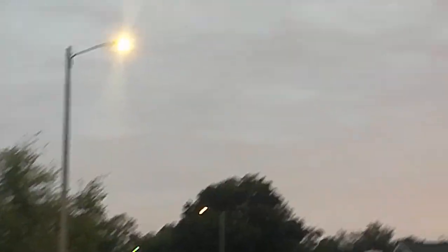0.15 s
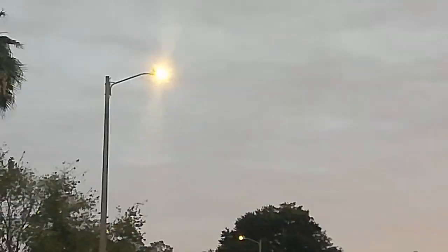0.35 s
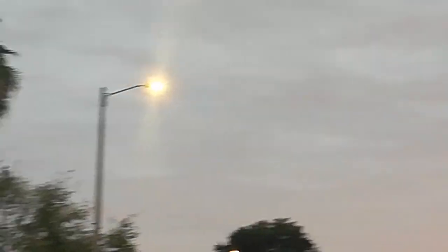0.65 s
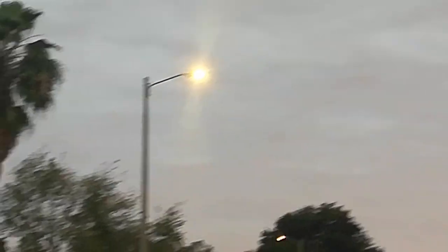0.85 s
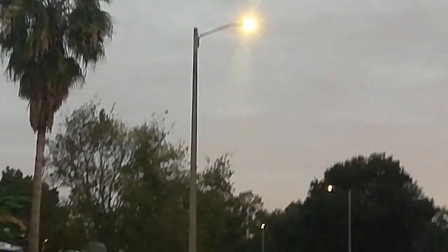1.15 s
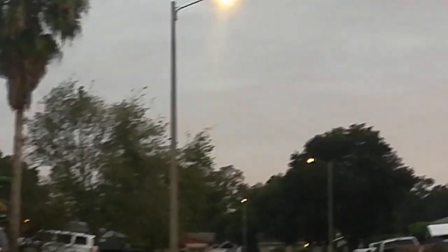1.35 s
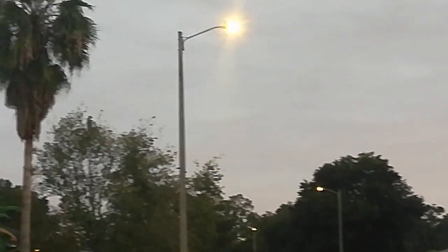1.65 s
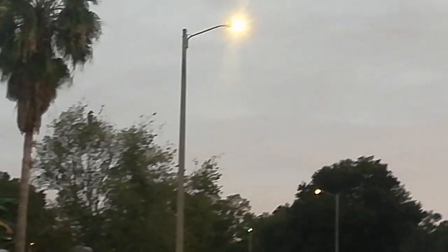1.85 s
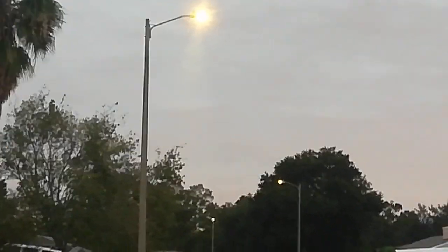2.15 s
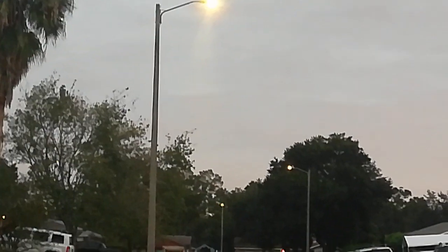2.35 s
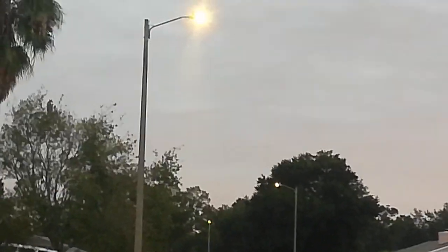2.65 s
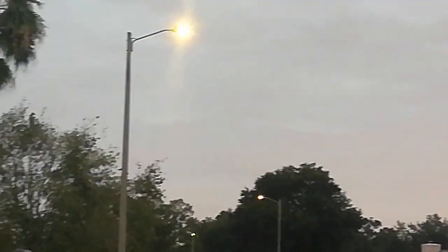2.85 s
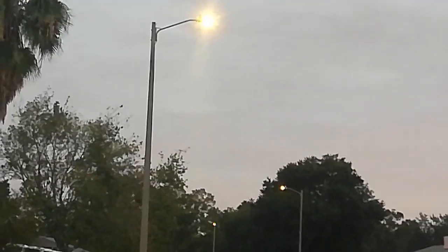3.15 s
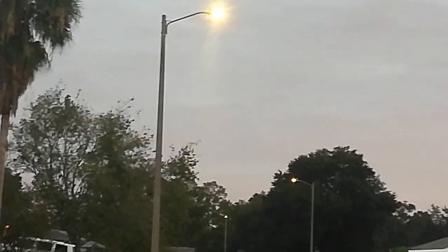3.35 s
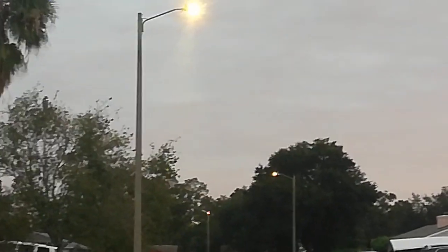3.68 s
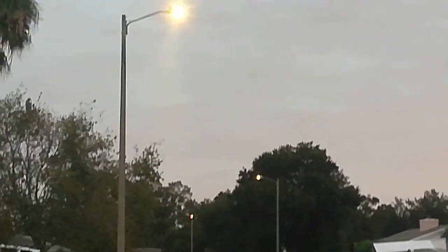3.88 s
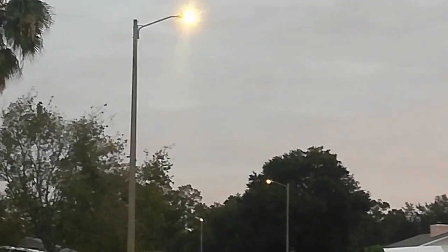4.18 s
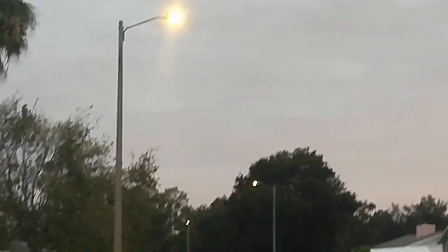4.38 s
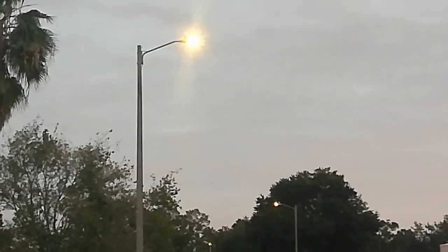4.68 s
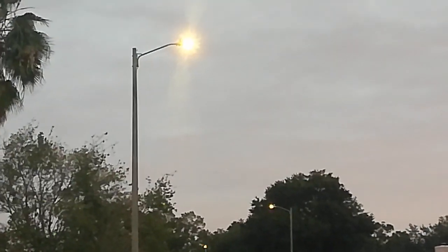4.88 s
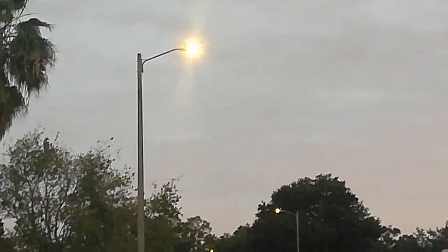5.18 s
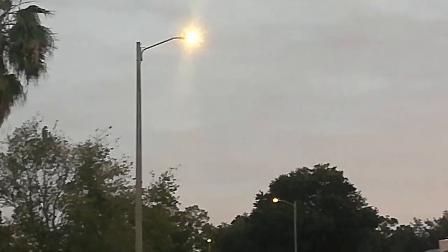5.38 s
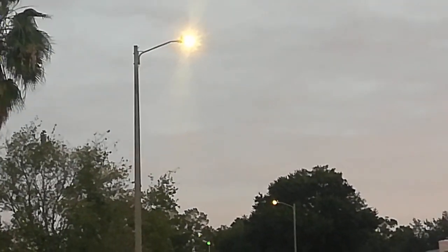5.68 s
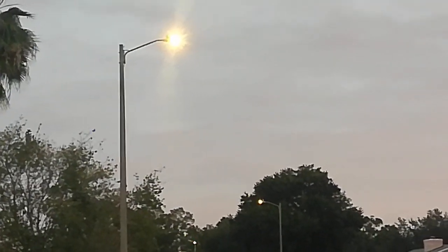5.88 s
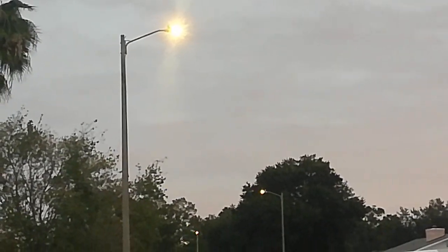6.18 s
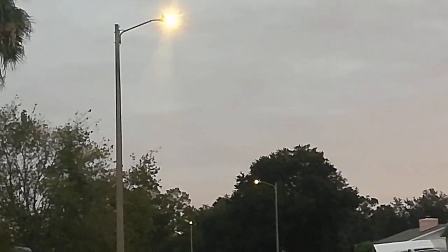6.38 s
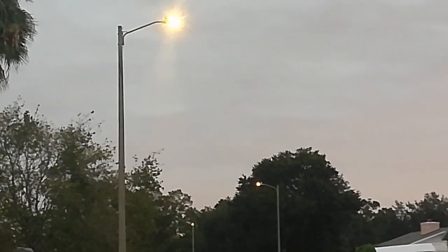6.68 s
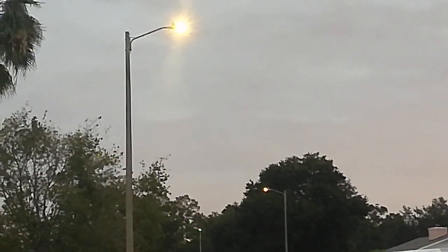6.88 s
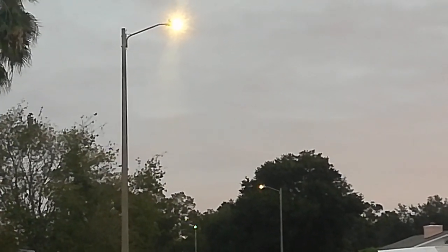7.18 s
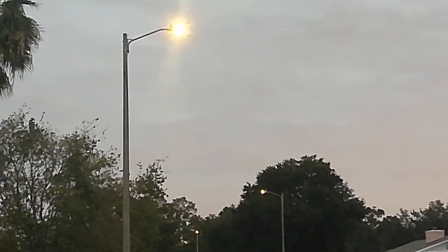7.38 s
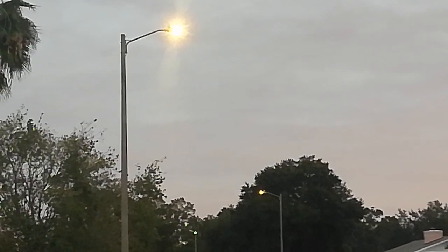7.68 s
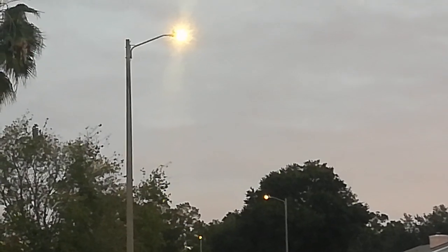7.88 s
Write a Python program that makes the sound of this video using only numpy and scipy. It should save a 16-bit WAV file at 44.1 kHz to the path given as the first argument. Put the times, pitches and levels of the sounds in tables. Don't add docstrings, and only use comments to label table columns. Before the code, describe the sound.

A handheld stereo microphone picks up a quiet street with trees at dawn, with faint distant traffic and light hiss throughout. Jays are already scolding at 0 s: hoarse, nasal, bright cries, each about 0.3 to 0.5 s, sliding downward and growing rougher, with a short diffuse echo. A tiny housing creak ticks at 0.4 s and a low thump at 1 s. Cries follow closely until about 2.9 s, then nearly stop, leaving faint low notes near 3.4 s. Wind rumbles strongest around 3.7 and 4.4 s. Calls resume at 4 s, with a rising pipe at 4.6 s and overlapping falls around 5 to 5.7 s. Dull finger bumps land near 4.5, 5.3 and 6.1 s. A thin, wavering far wail on the right is clearest from 5.9 to 6.5 s, ending in a clean whistle. From 6.5 s jays crowd together, with a short chirp at 7.7 s and cries continuing to the cut at 8 s.

```python
import sys
import numpy as np
from scipy import signal
from scipy.fft import rfft, irfft, next_fast_len
from scipy.io import wavfile
from scipy.ndimage import uniform_filter1d

SR = 44100
rng = np.random.default_rng(int(sys.argv[2]) if len(sys.argv) > 2 else 0)


def put_to_file(sound):
    columns = np.atleast_2d(sound).T
    safe = np.clip(columns, -1, 1)
    whole_steps = np.round(safe * 32767)
    wavfile.write(sys.argv[1], SR, whole_steps.astype(np.int16))


def attenuation_scalar(level_db):
    decades = np.asarray(level_db, float) / 20
    return 10 ** decades


N = 354556


def evened(x):
    return x / np.sqrt(np.mean(x ** 2) + 1e-20)


def read(points, hz):
    f, value = np.transpose(points)
    return np.interp(np.log(hz + 1), np.log(f + 1), value)


def colour(x, db_at):
    n = next_fast_len(x.shape[-1], real=True)
    gain = attenuation_scalar(db_at(np.fft.rfftfreq(n, 1 / SR)))
    return irfft(rfft(x, n) * gain, n)[..., :x.shape[-1]]


def add(mix, s, sound):
    at = round(s * SR)
    part = mix[max(at, 0):][:len(sound) + min(at, 0)]
    part += sound[max(-at, 0):][:len(part)]


def wobble(n, hz, count=1):
    slow = rng.standard_normal((count, (n // SR + 1) * SR // 16 + 300))
    slow = signal.lfilter(*signal.butter(N=2, Wn=hz, fs=SR / 16), slow)
    slow = evened(slow[:, 298:])
    place = np.arange(n) / 16
    low = place.astype(int)
    return np.squeeze(slow[:, low] + (place - low) * (slow[:, low + 1] - slow[:, low]))


def edges(t, rise, fall):
    return np.clip((t - t[0]) / rise, 0, 1) * np.clip((t[-1] - t) / fall, 0, 1)


# overtone, group (0 beak, 1 nasal, 2 bright), level_db within its group
OVERTONES = [(2, 0, -27.5), (3, 0, -21), (4, 0, 0), (5, 1, 0), (6, 1, 2.5), (7, 2, -5), (8, 2, 6),
             (9, 2, -2), (10, 2, -4), (11, 2, -16), (12, 2, -23)]
# freq_hz, density_db_per_hz
RASP_SPECTRUM = [(880, -53), (1500, -22), (2100, -15.5), (2440, -12.5), (2900, -4), (4200, -3), (4940, -11),
                 (5710, -9.5), (6370, -13), (6910, -9.5), (8270, -19.5), (8810, -15.5), (10000, -34),
                 (13000, -36)]


def cry(start, length, top_hz, last_hz, effort_db, nasal_db, bright_db, rasp_db, sag_db, scoop_s):
    t = np.arange(0, length, 1 / SR)
    strain = np.minimum(t / 0.28, 1.2)

    glide_hz = last_hz + (top_hz - last_hz) * (1 - t / length) ** 1.8
    hz = glide_hz * (1 - .2 * np.exp(-t / scoop_s))

    level_db = effort_db - 10 * np.exp(-t / (2.2 * scoop_s)) + sag_db * (t / length) ** 2
    beak_hz, beak_width_hz = 3350, 200
    main_db = level_db - np.minimum(((4 * hz - beak_hz) / beak_width_hz) ** 2, 8.)
    nasal_db = level_db + nasal_db + .6 * strain
    bright_db = nasal_db + bright_db - 5 * (strain - .4)
    rasp_db = level_db + rasp_db + 7 * (strain - 1)
    group_db = np.array([main_db, nasal_db, bright_db])

    jitter = 0.0054 * (0.24 + strain) * wobble(len(t), hz=150)
    turns = np.cumsum(hz * (1 + jitter)) / SR
    flutter_hz = 110 + 35 * wobble(len(t), hz=25.45)
    flutter = 1 + 0.23 * (0.3 + strain) * np.sin(2 * np.pi * np.cumsum(flutter_hz) / SR)

    k, group, db = np.transpose(OVERTONES)[:, :, None]
    waves = np.cos(2 * np.pi * (k * turns + rng.random(k.shape)))
    odd_db = -5.0 * (k % 2) * (1 - strain)
    drift_db = 2.9 * wobble(len(t), hz=28.7, count=len(k))
    nose_hz, nose_width_hz = 4250, 380
    db = db + 8 * np.exp(-((k * hz - nose_hz) / nose_width_hz) ** 2)
    overtone_db = group_db[group[:, 0].astype(int)] + db + odd_db + drift_db
    tone = np.sum(attenuation_scalar(overtone_db) * waves, axis=0)

    uneven = wobble(len(t), hz=202, count=len(k))
    blurred = np.sum(uneven * attenuation_scalar(-4.0 * (k % 2)) * waves, axis=0)
    airy = evened(blurred) + rng.standard_normal(SR)[:len(t)]
    rasp = attenuation_scalar(rasp_db) * evened(colour(airy, lambda f: read(RASP_SPECTRUM, f)))
    return (np.sqrt(2) * tone + rasp) * flutter * edges(t, rise=0.0054, fall=0.011)


# start_s, length_s, top_pitch_hz, last_pitch_hz, effort_db
NASAL_JAY = [
    (-.1, .4, 850, 700, -45),
    (1.15, .38, 850, 690, -39.5),
    (2.478, 0.38, 865, 665, -41.5),
    (4.31, 0.5, 881, 704.6, -42),
    (5.16, .33, 823, 702, -41.5),
    (5.29, .48, 825, 705, -39.5),
]
HOARSE_JAY = [
    (-.2, .3, 930, 800, -36),
    (1.445, 0.37, 905, 785, -35.5),
    (1.77, 0.36, 819, 706.5, -40),
    (6.595, .17, 885, 745, -41),
    (6.97, 0.5, 885, 700.3, -38),
    (7.07, 0.34, 923, 759.4, -38),
    (7.445, 0.25, 871, 775, -36),
]
FADING_JAY = [
    (0.6, 0.5, 870, 725, -37),
    (2.1, 0.4, 861, 705, -37.5),
    (4.89, 0.42, 875, 715, -35),
    (6.87, 0.32, 952, 769, -36.5),
    (7.78, .26, 956, 827, -37),
]
CLEAR_JAY = [
    (0.435, 0.4, 905, 699.4, -38),
    (3.87, .13, 730, 720, -67),
    (4.035, 0.44, 845, 721.4, -42),
    (6.51, .13, 910, 840, -45),
    (6.745, .375, 895, 735, -37.5),
]
PIPING_JAY = [
    (4.58, .3, 885, 940, -40.5),
    (7.71, .12, 870, 815, -34),
    (7.83, .21, 835, 720, -39),
]
FAR_JAY = [
    (2.62, 0.31, 935, 885, -50),
    (3.3, .13, 680, 640, -63),
    (3.44, .11, 635, 605, -56.5),
    (5.64, .36, 965, 792, -35.5),
]
# left_minus_right_db, left_lead_ms
JAY_PLACES = [(-3, .52), (-3, .7), (-3.5, .52), (-2.5, .6), (-2.5, .55), (-5, -.4)]
# nasal_db (overtones 5-6), bright_db (7 up), rasp_db, end_sag_db, scoop_s
MANNERS = [(-13, -5, -1, -1.5, .008), (-18, -5, -.8, -5, .004), (-22, -3, -5, -14, .007),
           (-16, -2.5, -2.5, -3, .015), (-24, -7, -2.5, -3, .004), (-22.5, -8, -7, -18, .005)]
# freq_hz, left_minus_right_db
HOUSING_SHADE = [(60, 8), (130, 2), (290, -4), (640, -4), (1410, -3.5), (3100, -6), (6820, 6), (15000, 7)]


def jays():
    out = np.zeros((2, N))
    flock = NASAL_JAY, HOARSE_JAY, FADING_JAY, CLEAR_JAY, PIPING_JAY, FAR_JAY
    for cries, (pan_db, lead_ms), manner in zip(flock, JAY_PLACES, MANNERS):
        for row in cries:
            sound = cry(*row, *manner)
            add(out[0], row[0] + max(-lead_ms, 0) / 1000, attenuation_scalar(pan_db / 2) * sound)
            add(out[1], row[0] + max(lead_ms, 0) / 1000, attenuation_scalar(-pan_db / 2) * sound)
    tilt = np.array([[.5], [-.5]])
    return colour(out, lambda f: tilt * (read(HOUSING_SHADE, f) + 2.96))


def thin_voice(t, hz, main_db, blur):
    turns = np.cumsum(hz + 0.39 * blur * wobble(len(t), hz=40.6)) / SR
    low, main, high = (np.cos(2 * np.pi * k * turns) for k in (1, 2, 4))
    chest_hz, chest_width_hz = 980, 31
    low_db = -11.5 - np.minimum(((hz - chest_hz) / chest_width_hz) ** 2 * 10, 16.)
    parts = attenuation_scalar(main_db) * (attenuation_scalar(low_db) * low + main + attenuation_scalar(-24.0) * high)
    return np.sqrt(2) * parts * attenuation_scalar(0.09 * blur * wobble(len(t), hz=35.2))


# time_s, pitch_hz, second_partial_db, blur_hz
WAIL = [(5.2, 1226, -62, 18), (5.4, 1075, -65, 61), (5.781, 1000, -61.5, 54.7), (5.861, 989, -54, 40),
        (5.97, 979, -56.5, 29.5), (6.04, 961, -48.5, 25.6), (6.33, 977, -48.5, 25.4), (6.49, 919, -59, 26),
        (6.6, 930, -68, 21)]
# start_s, length_s, pitch_hz, level_db
WHISTLES = [
    (6.616, 0.34, 941.3, -46),
    (7.025, 0.086, 946, -50),
    (7.196, 0.18, 944, -70),
]


def wail():
    s, *columns = np.transpose(WAIL)
    t = np.arange(s[0], s[-1], 1 / SR)
    voice = np.zeros(N)
    glide = thin_voice(t, *(np.interp(t, s, c) for c in columns))
    add(voice, s[0], glide * edges(t, rise=0.041, fall=.02))
    for start, length, hz, db in WHISTLES:
        t = np.arange(0, length, 1 / SR)
        swell = np.sin(np.pi * (t / length) ** .95) ** 1.16
        add(voice, start, thin_voice(t, hz, db, blur=2.2) * swell)
    late = np.roll(voice, round(.0005 * SR))
    return np.array([attenuation_scalar(-10.5) * late, attenuation_scalar(7.5) * voice])


# freq_hz, t60_s
STREET_DECAY = [(500, 1.0), (2500, 0.75), (5000, 0.81), (9000, 0.51)]


def street(x):
    taps = np.zeros((2, SR))
    at = np.arange(500, SR - 20, 20) + rng.integers(0, 20, (2, (SR - 501) // 20))
    np.put_along_axis(taps, at, rng.choice([-1., 1.], at.shape), 1)
    hz, t, z = signal.stft(taps, SR, nperseg=256)
    decay = attenuation_scalar(-60 * t / read(STREET_DECAY, hz)[:, None])
    tail = signal.istft(z * decay, SR, nperseg=256)[1]
    return signal.fftconvolve(x, tail / np.linalg.norm(tail[0]), axes=1)[:, :N]


# peak_s, level_db, rise_s, fall_s
GUSTS = [(0.03, -47, .2, 0.26), (0.98, -46, .07, .05), (3.33, -49.5, 0.077, .07), (3.7, -30, 0.13, 0.18),
         (3.909, -38.5, 0.29, 0.056), (4.36, -32.5, 0.17, 0.091), (4.45, -46.5, 0.12, .7),
         (5.33, -49, 0.13, 0.16), (5.55, -48.5, 0.069, 0.19), (5.8, -46.5, 0.098, 0.14),
         (6.07, -45, 0.085, .11)]
# freq_hz, gain_db
GUST_SPECTRUM = [(20, -23), (40, -1), (90, 3), (150, -3.5), (220, -18.5), (350, -49), (500, -81)]


def wind():
    t = np.arange(N) / SR
    breeze_db = -56
    gusts_db = [np.interp(t, [s - rise, s, s + fall], [breeze_db, db, breeze_db]) for s, db, rise, fall in GUSTS]
    level_db = np.max(gusts_db, axis=0)
    raw = rng.standard_normal((2, N)) * 0.082 + rng.standard_normal(N)
    raw *= attenuation_scalar(2.4 * wobble(N, hz=18.0))
    body = evened(colour(raw, lambda f: read(GUST_SPECTRUM, f)))
    edge = evened(colour(raw, lambda f: -60 * np.log2((f + 1) / 230) ** 2))
    return attenuation_scalar(level_db) * body + attenuation_scalar(1.42 * (level_db + 40.5) - 54) * edge


# time_s, peak_db, pitch_hz
BUMPS = [
    (0.975, -29, 87.5),
    (3.33, -40, 90),
    (4.528, -31.5, 91.5),
    (4.69, -35, 88),
    (5.32, -30, 90),
    (6.071, -31, 90),
]
# time_s, peak_db, upper_hz, lower_hz
TICKS = [
    (0.392, -52, 1186, 500),
    (0.409, -37, 1150, 520),
    (0.42, -40, 1180, 503),
]


def handling():
    out, t = np.zeros((2, N)), np.arange(4000) / SR
    for s, db, hz in BUMPS:
        push = np.sin(2 * np.pi * hz * t) * np.exp(-((t * hz - .35) / 0.32) ** 2)
        add(out.T, s, attenuation_scalar(db) * push[:, None] * [1, 1])
    for s, db, upper_hz, lower_hz in TICKS:
        modes = np.sin(2 * np.pi * upper_hz * t) + 0.46 * np.sin(2 * np.pi * lower_hz * t)
        ring = modes * np.exp(-t / 0.0046)
        add(out.T, s, attenuation_scalar(db) * ring[:, None] * attenuation_scalar([-4, 3]))
    return out


# freq_hz, density_db_per_hz
AIR_SPECTRUM = [(15, -30), (25, -7), (75, -3), (209, -16), (313, -23.5), (410, -19.5), (551, -25.5),
                (666, -19), (782, -17.5), (1050, -23.5), (1530, -25.5), (2060, -29), (3720, -31),
                (5880, -38.5), (15500, -45.5)]
# freq_hz, likeness
AIR_COHERENCE = [(60, 1), (180, 1), (550, 0.32), (1650, 0.13), (4970, 0.092), (15000, 0.03)]
# freq_hz, left_minus_right_db
AIR_BALANCE = [(60, -0.5), (180, 1), (550, -2.5), (1650, -3.5), (4970, -2.5), (15000, 2)]


def air():
    frames, hz = N // 256 + 5, np.fft.rfftfreq(1024, 1 / SR)
    a, b, c, d, patches = rng.standard_normal((frames, 513, 5)).T
    patches = evened(uniform_filter1d(uniform_filter1d(patches, 12, 0), 20, 1))
    same = np.clip(read(AIR_COHERENCE, hz), -1, 1)[:, None]
    left = a + 1j * b
    right = same * left + np.sqrt(1 - same ** 2) * (c + 1j * d)
    z = np.array([left, right])
    z *= attenuation_scalar(read(AIR_SPECTRUM, hz)[:, None] + 1.43 * patches)
    z *= attenuation_scalar(np.array([[.5], [-.5]]) * read(AIR_BALANCE, hz))[:, :, None]
    noise = signal.istft(z, nperseg=1024, noverlap=768)[1][:, :N]
    above_rumble = colour(noise.mean(0), lambda f: -200 * (f < 300))
    return attenuation_scalar(-62) * noise / np.std(above_rumble)


def scene():
    near, far = jays(), wail()
    shakes = wind() + handling()
    shakes[0] = np.roll(shakes[0], round(0.00066 * SR))
    direct = attenuation_scalar(-2.5) * near + attenuation_scalar(-1.0) * far
    scattered = street(attenuation_scalar(-5.0) * near + attenuation_scalar(-9) * far)
    return direct + scattered + air() + shakes


def band_limit(x):
    return signal.sosfilt(signal.butter(12, 15700, fs=SR, output="sos"), x)


def record(dry):
    return band_limit(dry)


dry = scene()
out = record(dry)
put_to_file(out)
```